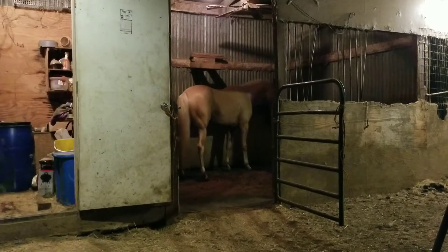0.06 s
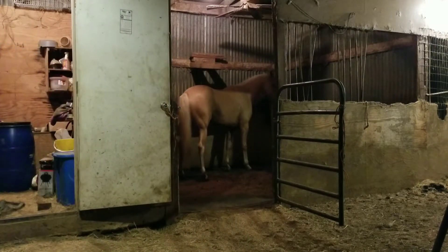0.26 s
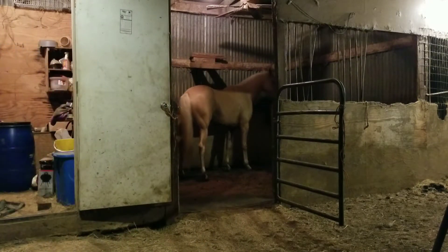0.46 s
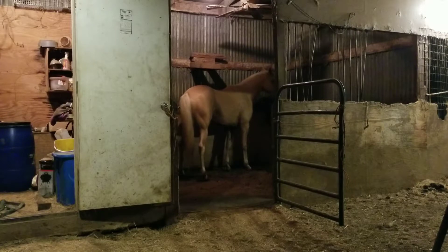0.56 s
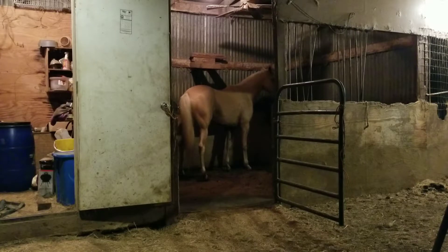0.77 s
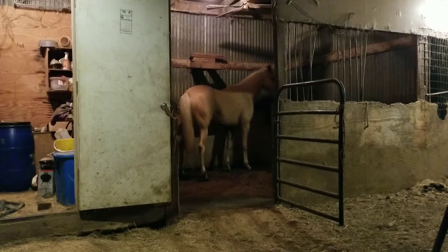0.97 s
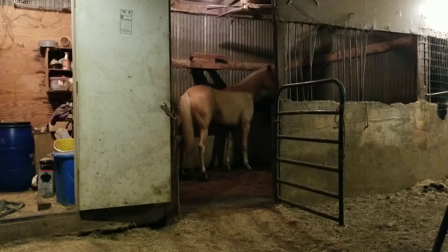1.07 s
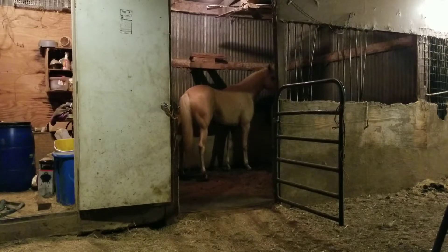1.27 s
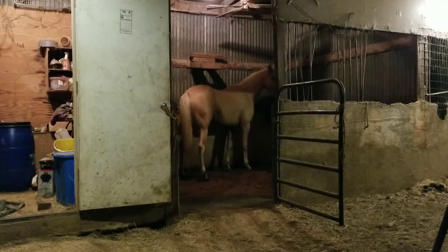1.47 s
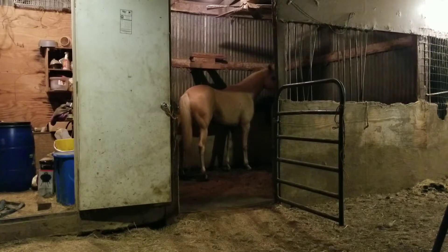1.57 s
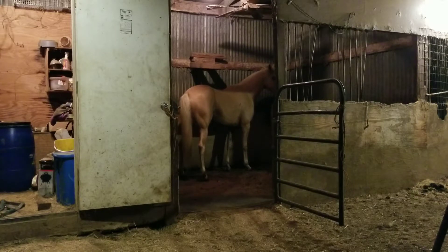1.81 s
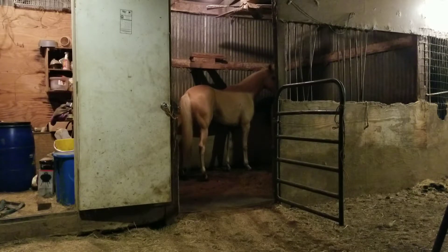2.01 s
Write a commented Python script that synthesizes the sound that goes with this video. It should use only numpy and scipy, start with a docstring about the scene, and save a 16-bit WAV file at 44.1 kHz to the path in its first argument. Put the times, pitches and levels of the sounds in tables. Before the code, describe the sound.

In a quiet barn stall, a hoof seems to touch the boards, then strikes once, nearby and slightly left, with a short echo. Uneven low hum and air noise continue, with faint rustling and a small dull tap near the end.

```python
"""A knock in a barn stall

One sharp knock near a stereo microphone, probably a hoof on boards: a light touch, then the blow,
which sets wood and thin metal ringing. Near walls throw it back and the barn dies away quickly.
Under it lie an uneven low hum, air noise, a faint whine, a few soft rustles and one small, late tap."""
import sys
import numpy as np
from scipy import signal
from scipy.fft import rfft, irfft, next_fast_len
from scipy.io import wavfile
from scipy.ndimage import map_coordinates

SR = 44100
rng = np.random.default_rng(int(sys.argv[2]) if len(sys.argv) > 2 else 0)


def inscribe(sig):
    """Save sig as 16-bit PCM at rate SR to the path in sys.argv[1].

    A 1-D sig is mono; a 2-D sig holds one channel per row.
    Samples are clipped to [-1, 1] before scaling.
    """
    pcm = np.round(np.clip(np.atleast_2d(sig).T, -1, 1) * 32767)
    wavfile.write(sys.argv[1], SR, pcm.astype(np.int16))


N = 90404


def amp(db):
    return 10 ** (np.asarray(db) / 20)


def unit(x):
    return x / np.sqrt(np.mean(x ** 2) + 1e-20)


def along(points, hz):
    """Reads (Hz, value) points on a log axis."""
    freqs, values = np.transpose(points)
    return np.interp(np.log(hz + 1), np.log(freqs + 1), values)


def since(start):
    """Seconds since start, zero before it."""
    return np.maximum(np.arange(N) / SR - start, 0)


def curve(rows):
    """Joins (s, value) points, one value per sample."""
    return np.interp(since(0), *np.transpose(rows))


def wobble(rate):
    """A smooth random curve, rate knots a second."""
    return map_coordinates(rng.standard_normal(int(N * rate / SR) + 4), [since(0) * rate])


def filtered(x, response):
    """x through a complex frequency response."""
    size = next_fast_len(N + SR // 2)
    return irfft(rfft(x, size) * response(np.fft.rfftfreq(size, 1 / SR)), size)[..., :N]


def placed(x, lag_ms):
    """Stereo, reaching the right microphone lag_ms after the left."""
    return filtered(x, lambda hz: np.exp(1j * np.pi * hz * lag_ms / 1000 * np.array([[1], [-1]])))


def pan(db):
    """Two gains, the left db above the right."""
    return amp(np.array([[.5], [-.5]]) * db)


def noise(spectrum, likeness):
    """Coloured stereo noise of rms 1, with the given left-right likeness."""
    def response(hz):
        width = np.arccos(np.clip(along(likeness, hz), -1, 1)) / 2
        return amp(along(spectrum, hz)) * [np.cos(width), np.sin(width)]
    mid, side = filtered(rng.standard_normal((2, N)), response)
    return unit(np.array([mid + side, mid - side]))


def tone(hz, wander_hz, rate):
    """A sine of rms 1 whose pitch wanders."""
    return unit(np.sin(2 * np.pi * np.cumsum(hz + wander_hz * wobble(rate)) / SR))


def ring(modes, start, rise_s, spread, rough):
    """Damped modes whose phase differs between sides (spread) and wavers (rough), in radians."""
    t = since(start)
    out = 0
    for hz, db, t60 in modes:
        phase = rng.uniform(0, 2 * np.pi) + spread * rng.standard_normal((2, 1)) + rough * wobble(127.7)
        out += amp(db - 60 * t / t60) * np.sin(2 * np.pi * hz * t + phase)
    return (1 - np.exp(-t / rise_s)) * out


# Room tone across the microphone pair. Each row: frequency in Hz, left-right likeness from 0 to 1.
ROOM_LIKENESS = [(60, 1), (250, 0.97), (700, 0.26), (2000, 0.31), (6000, 0.083), (12000, 0.041)]
# The hum's rumble, tones and upper drone. Each row: frequency in Hz, relative level in dB.
RUMBLE_SPECTRUM = [(13, -62), (22, -33), (32, -52), (40, -13), (51, -11.5), (81, -5.5), (134, -6.5),
                   (165, -11.5), (240, -19), (340, -27.5), (600, -70)]
HUM_TONES = [(72, -7), (92, -5.5)]
DRONE_SPECTRUM = [(150, -19), (225, 2.5), (280, 4), (340, -1), (430, -20), (700, -85)]
# How the low part and the drone swell and sink. Each row: time in seconds, level in dB.
LOW_LEVEL = [(0, -42), (.45, -44.5), (.55, -41.5), (.92, -39), (1.05, -42.5), (1.25, -40), (1.45, -46.5),
             (1.57, -39.5), (1.74, -47), (1.9, -38.5), (2.05, -43.5)]
DRONE_LEVEL = [(0, -41.5), (.4, -47), (.6, -46.5), (.9, -49), (1.1, -51.5), (1.7, -52), (1.95, -53.5),
               (2.05, -42)]

def hum():
    """The barn's uneven hum: rumble and two wavering tones under a higher drone."""
    rumble = amp(-1.5) * noise(RUMBLE_SPECTRUM, ROOM_LIKENESS)
    tones = sum(amp(db) * tone(hz, wander_hz=10, rate=30) for hz, db in HUM_TONES)
    drone = amp(curve(DRONE_LEVEL)) * noise(DRONE_SPECTRUM, ROOM_LIKENESS)
    return placed(amp(curve(LOW_LEVEL)) * (rumble + tones) + drone, lag_ms=.31)


# The air in the stall. Each row: frequency in Hz, relative level in dB.
AIR_SPECTRUM = [(100, -3), (260, -2.5), (480, -3.5), (720, 2), (1200, -4), (1700, -6.5), (2250, -13.5),
                (2750, -10), (3200, -16.5), (3700, -18.5), (4500, -19.5), (5200, -30.5), (5600, -37),
                (6050, -37.5), (6400, -26.5), (6750, -16), (7250, -10.5), (7850, -31), (9400, -21),
                (11000, -24), (15700, -28)]
# Its slow drift. Each row: time in seconds, level in dB.
AIR_LEVEL = [(0, -44), (.5, -43), (1, -43.5), (1.4, -43), (1.7, -43), (2.05, -42)]
# Its lean to one side. Each row: frequency in Hz, left over right in dB.
AIR_BALANCE = [(2000, 0.5), (7000, -1.5), (8600, -3.5), (12500, -3.5), (15000, 7)]

def air():
    """Nearly steady air noise all round the microphone, with a thin whine in it."""
    hiss = filtered(noise(AIR_SPECTRUM, ROOM_LIKENESS), lambda hz: pan(along(AIR_BALANCE, hz)))
    level_db = curve(AIR_LEVEL) + .6 * wobble(8.2)
    whine = amp(-54.5) * tone(2891, wander_hz=35.6, rate=150)
    return placed(amp(level_db) * hiss + whine, lag_ms=.4707)


# Rustles. Each row: centre and length in seconds, hiss and scrape in dB, hiss left over right in dB.
RUSTLES = [(0.185, 0.1, -49.5, -58.5, 5), (0.573, 0.073, -58, -64, 8), (0.695, 0.069, -48.5, -52, -7),
           (1.107, .09, -54, -61, 3), (1.299, 0.059, -50, -53, -8), (1.524, 0.084, -49.5, -53.5, -7),
           (1.84, 0.11, -56, -64, 6)]
# Their two colours. Each row: frequency in Hz, relative level in dB.
HISS_SPECTRUM = [(5000, -25), (8500, -24), (11000, -3), (12600, 5), (14700, 3), (15900, 7.5)]
SCRAPE_SPECTRUM = [(800, -22), (2000, -2), (2600, 17), (3400, -29), (4000, 12), (4700, 7.5), (5500, -26),
                   (9000, -30)]

def rustles():
    """Soft swells of hiss and lower scrape on either side of the microphone."""
    hiss = noise(HISS_SPECTRUM, likeness=[(1000, .1)])
    scrape = noise(SCRAPE_SPECTRUM, likeness=[(1000, .41)])
    out = 0
    for centre, length, hiss_db, scrape_db, side_db in RUSTLES:
        swell = np.exp(-2 * ((since(0) - centre) / length) ** 2)
        out += swell * (pan(side_db) * amp(hiss_db) * hiss + pan(side_db / 2) * amp(scrape_db) * scrape)
    return out


# The scuff on the boards. Each row: frequency in Hz, relative level in dB.
SCUFF_SPECTRUM = [(400, -20), (3000, -21), (5500, -5), (6300, 3.5), (7000, -9), (8500, -12), (10000, 1),
                  (11000, 4), (12000, -6), (15500, 3.5)]
# Scuff and echoes across the pair. Each row: frequency in Hz, left-right likeness from 0 to 1.
KNOCK_LIKENESS = [(150, .95), (500, 1), (1500, 0.39), (5000, 0.1), (12000, 0.045)]

def touch(start, rise_s=.007, t60=.16):
    """The first light contact: a scuff and a small thud."""
    t = since(start)
    envelope = (1 - np.exp(-t / rise_s)) * amp(-28 - 60 * t / t60)
    scuff = envelope * noise(SCUFF_SPECTRUM, KNOCK_LIKENESS)
    thud = ring([(144, -24, .038)], start, rise_s=.0023, spread=.1, rough=.2)
    return scuff + thud


# Paths to the microphone: direct, then off walls, 2 to 7 metres longer.
# Each row: delay in seconds, gain in dB, lag of the right side in ms.
BLOW_PATHS = [(0, 0, .17), (.0062, -4, .15), (.0088, -14, -.1), (.0212, -13, .1)]
# The crack of the impact. Each row: frequency in Hz, relative level in dB.
CRACK_SPECTRUM = [(300, -1), (700, 4), (1300, 15), (2200, -14), (4300, -4), (6000, -16), (8000, -17.5),
                  (15000, -12)]

def blow(start, push_hz=350, crack_t60=.015):
    """One low shove and a short crack, heard directly and off the nearest walls."""
    out = 0
    for delay, db, lag_ms in BLOW_PATHS:
        arrival = start + delay
        u = np.pi * push_hz * (since(0) - arrival - .001)  # the shove peaks 1 ms in
        push = amp(-9) * (1 - 2 * u ** 2) * np.exp(-u ** 2)
        t = since(arrival)
        envelope = amp(-10.5 - 60 * t / crack_t60) * (1 - np.exp(-t / .0001))
        crack = envelope * noise(CRACK_SPECTRUM, likeness=[(1000, 1), (12000, .82)])
        out += amp(db) * placed(push + crack, lag_ms)
    return out


# The stall's boards. One entry per mode: frequency in Hz, level in dB, seconds to fall 60 dB.
BOARD_HZ = [163, 243, 279, 394, 483, 536, 664, 745, 894, 939, 992, 1075, 1149, 1340, 1481, 1667, 2310, 2570]
BOARD_DB = [-28, -26, -29, -27, -27, -31, -28.5, -44, -26.5, -29.5, -23, -24, -27, -27, -24.5, -31, -31,
            -27.5]
BOARD_T60 = [.2, .12, .15, .24, .27, .25, .27, .7, .25, .2, .18, .19, .21, .17, .18, .19, .14, .16]

def boards(start):
    """The struck boards ring, just left of centre."""
    return pan(1.2) * ring(zip(BOARD_HZ, BOARD_DB, BOARD_T60), start, rise_s=.003, spread=.3, rough=.2)


# Metal to the left of the microphone. One entry per mode: frequency in Hz, level in dB.
METAL_HZ = [6285, 6650, 10100, 11020, 12680, 13690, 15130, 15680]
METAL_DB = [-39, -48, -48, -45, -41, -35, -37.5, -32.5]

def metal(start, t60=.19):
    """Metal shaken by the blow gives a thin, unsteady ring."""
    modes = [(hz, db, t60) for hz, db in zip(METAL_HZ, METAL_DB)]
    return pan(5) * ring(modes, start, rise_s=.001, spread=.9, rough=.7)


# The barn beyond the stall. Each row: frequency in Hz, relative echo level in dB.
ECHO_SPECTRUM = [(59, -40), (100, -15), (170, -9), (282, -10.5), (500, -16), (814, -4), (1070, -4.5),
                 (2160, -6), (2610, -6), (4720, -21), (6490, -19.5), (7370, -30.5), (15800, -22.5)]
# Its decay. Each row: frequency in Hz, seconds to fall 60 dB.
BARN_T60 = [(150, 0.6), (500, 0.58), (1000, 0.26), (3000, 0.2), (8000, .2), (15000, 0.34)]
# Its lean to one side. Each row: frequency in Hz, left over right in dB.
ECHO_BALANCE = [(200, 0), (600, -.5), (1200, 8.5), (3000, -6.5), (8000, .5), (14000, -7)]

def barn(start, rise_s=.0035, tail_t60=.55):
    """Dense echoes of the blow, each band dying at its own speed, and a faint tail."""
    t = since(start)
    band_hz, frame_s, bands = signal.stft(noise(ECHO_SPECTRUM, KNOCK_LIKENESS), SR, nperseg=256)
    fade = amp(-60 * np.maximum(frame_s - start, 0) / along(BARN_T60, band_hz)[:, None])
    early = amp(-18.5) * signal.istft(bands * fade, SR, nperseg=256)[1][:, :N]
    tail = amp(-38 - 60 * t / tail_t60) * noise(ECHO_SPECTRUM, KNOCK_LIKENESS)
    echoes = (early + tail) * (1 - np.exp(-t / rise_s))
    return filtered(echoes, lambda hz: pan(along(ECHO_BALANCE, hz)))


def tap(start, hz=800, db=-28.5, t60=.02):
    """A small dull tap on wood."""
    return ring([(hz, db, t60)], start, rise_s=.0015, spread=.23, rough=.32)


def scene():
    """The stall from one spot: room tone, the knock a little to the left, then the tap."""
    knock_s = .2222
    ringing = boards(knock_s) + metal(knock_s) + barn(knock_s)
    knock = placed(touch(start=.188) + ringing, lag_ms=.131) + blow(knock_s)
    return hum() + air() + rustles() + knock + tap(start=1.726)


def record(dry):
    """The recorder keeps nothing above its band limit."""
    return filtered(dry, lambda hz: hz < 15900)


dry = scene()
out = record(dry)
inscribe(out)
```